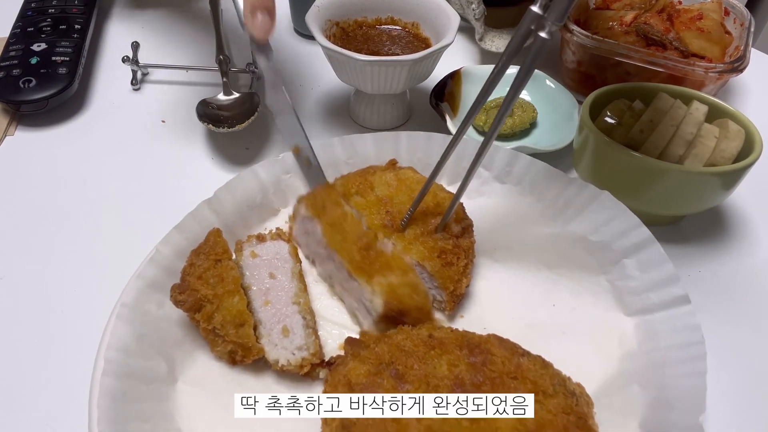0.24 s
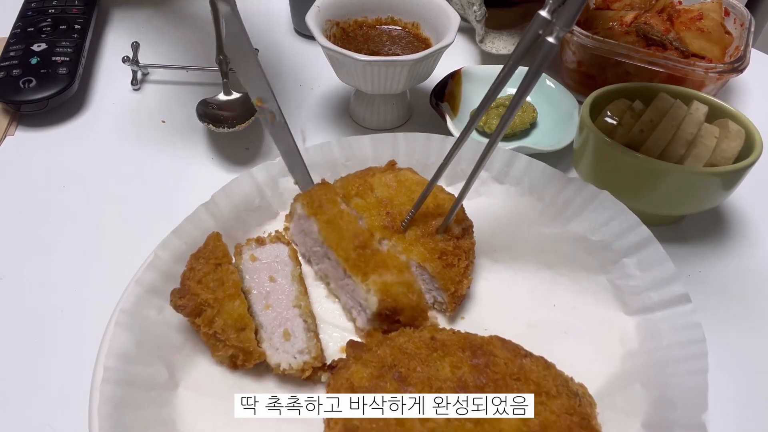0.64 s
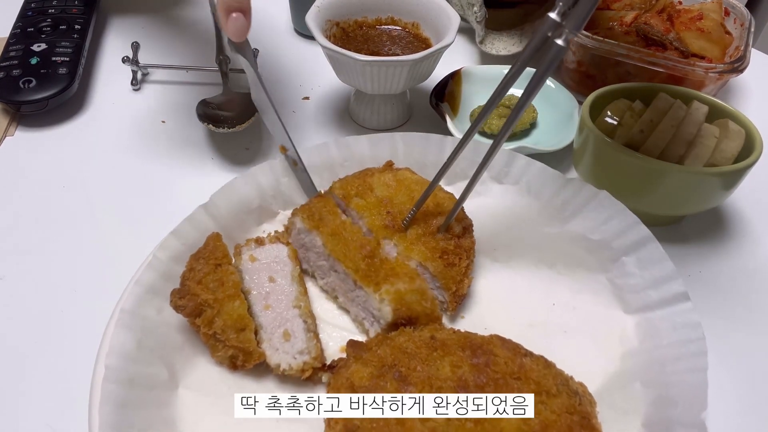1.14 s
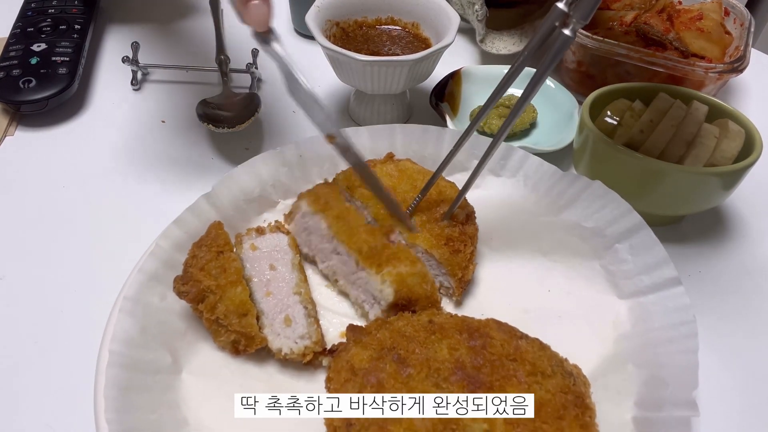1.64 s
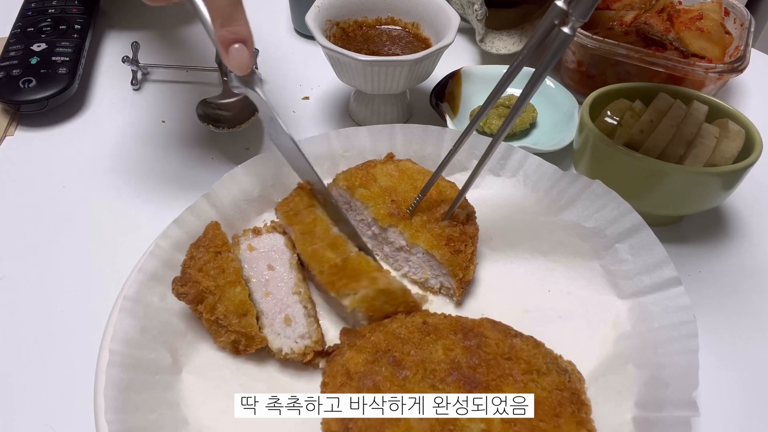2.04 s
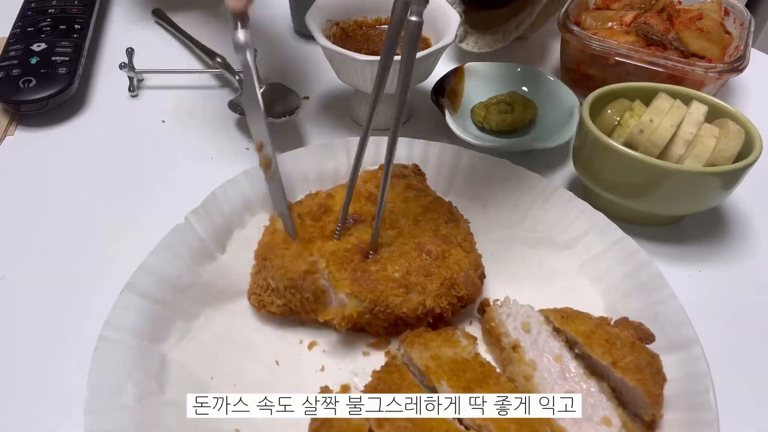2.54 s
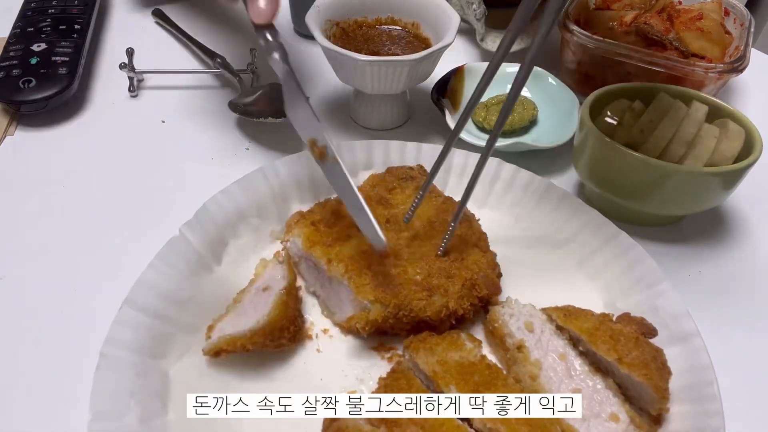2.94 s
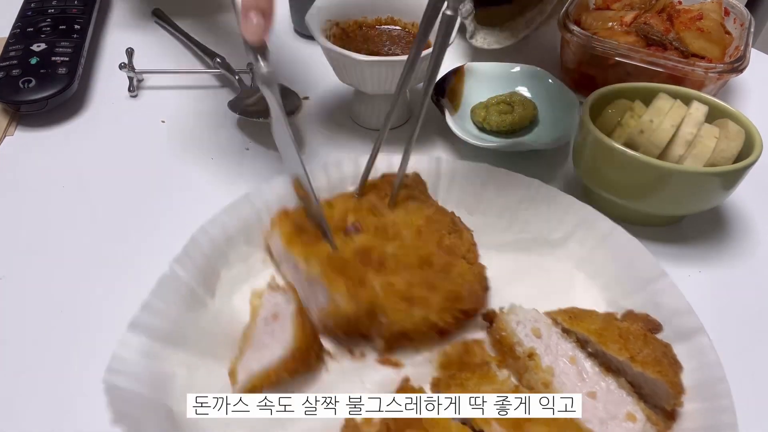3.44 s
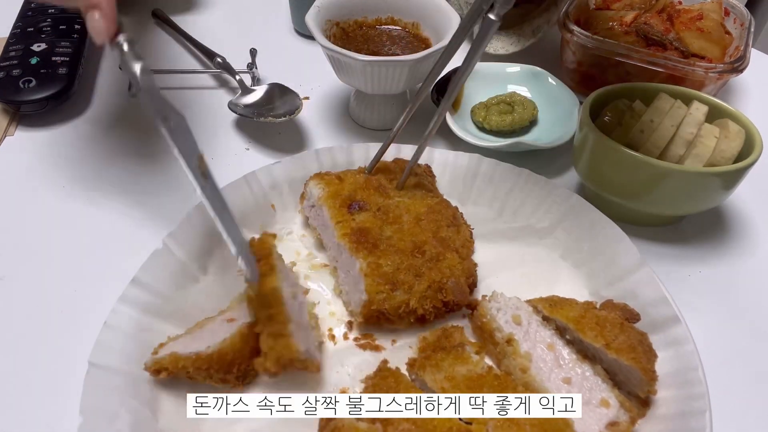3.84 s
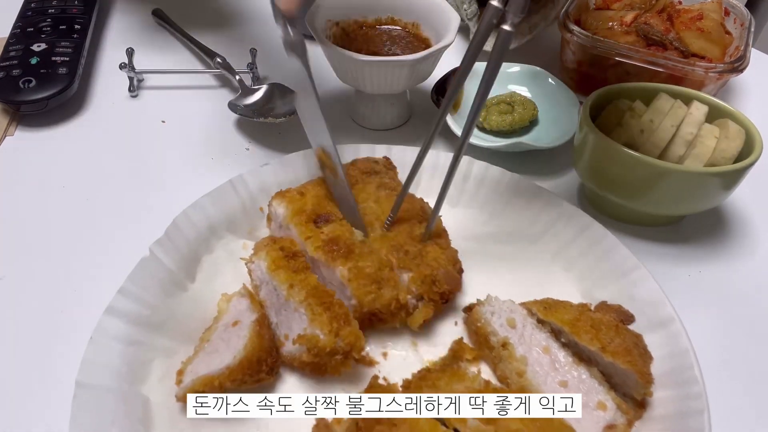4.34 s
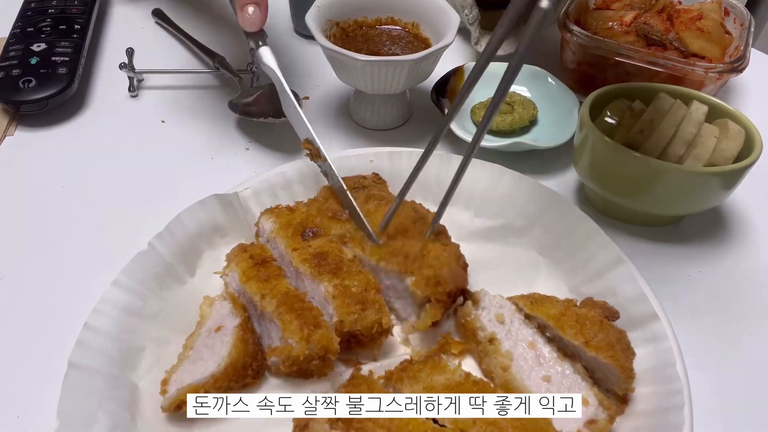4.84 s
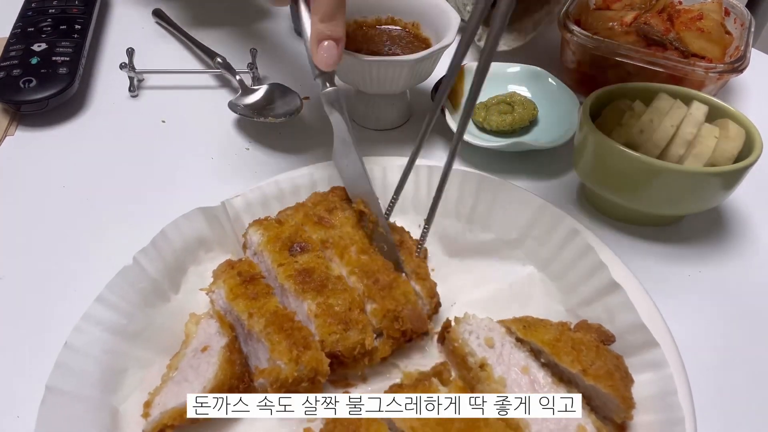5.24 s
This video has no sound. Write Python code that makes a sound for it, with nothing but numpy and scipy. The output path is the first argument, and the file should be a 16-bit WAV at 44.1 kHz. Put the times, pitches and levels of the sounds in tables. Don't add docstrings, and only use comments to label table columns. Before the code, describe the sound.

In a quiet, dry kitchen, a serrated knife saws a crisp breaded cutlet close to a stereo phone microphone. From 0 to 0.2 seconds there are dense crunches, a hollow low plate thud and a table shudder. Crackling scrapes return near 0.25 and 0.36-0.46, then the loudest brittle snaps and crumbling crust at 0.58-0.8. Softer strokes follow around 0.9-1.4, fading to faint rubbing by 1.5-2.2, with one sharp click at 2.2. At 2.3 the sound switches abruptly to sped-up cutting: higher, thin, without bass. Rapid rows of crunchy ticks, roughly 25 per second, run at 2.35-2.7, 3.1-3.7 and 4.1-4.7, the middle one weakening. A short, sparser group follows at 5.0-5.2, then weak dragging ticks at 5.35-5.5. Between them come tiny bright flicks, brief squeaky tones, faint room air and a very quiet wavering motor hum.

```python
import sys
import numpy as np
from scipy import signal
from scipy.fft import rfft, irfft, next_fast_len
from scipy.io import wavfile
from scipy.ndimage import uniform_filter1d, minimum_filter1d

SR = 44100
rng = np.random.default_rng(int(sys.argv[2]) if len(sys.argv) > 2 else 0)


def pcm_store(signal):
    levels = np.round(np.clip(np.atleast_2d(signal), -1, 1) * 32767)
    wavfile.write(sys.argv[1], SR, levels.astype(np.int16).T)


def magnitude_from_level(level_db):
    exponent = np.asarray(level_db, float) / 20
    return 10 ** exponent


N = 242977
TIME = np.arange(N) / SR
CUT_S = 2.312
LEAD = 512


# start in seconds, hold in seconds, crumble level in dB, scrape in dB, plate in dB.
STROKES = [(0.008, 0.0065, -51, -5.5, -6), (0.062, 0.038, -42.5, -5, -10), (0.104, 0.041, -52, 7, 17),
           (0.173, 0.039, -52.5, -1, 11), (0.243, 0.044, -40.5, -4, -6.5), (0.387, 0.054, -37, -2.5, -11.5),
           (0.458, 0.031, -54, 4, 11), (0.579, 0.027, -37, -7, -7.5), (0.671, .12, -41, -3, -1),
           (0.864, 0.04, -40.5, -4.5, -4), (0.998, 0.04, -48.5, -1.5, 7.5), (1.084, 0.29, -58.5, -7, 2.5),
           (1.43, 0.23, -70, -8, -3), (1.829, 0.035, -64.5, -9.5, -13.5), (1.913, 0.033, -58, -8.5, -8.5),
           (2.001, 0.095, -53, -9, -14.5), (2.116, 0.18, -50.5, -9.5, -15)]
# time in seconds, peak in dB, scrape in dB, left minus right in dB.
SNAPS = [(0.023, -23, -4.5, 5), (.034, -17, -1, -9), (.041, -17.5, -1.5, 8), (0.363, -30.5, -2, -2),
         (0.3775, -31, 5, -1), (.385, -41, 2, -6), (0.4182, -37, 7, -5), (0.4412, -21, -2, 5),
         (0.402, -24, -5, 2), (0.4255, -18, -1, 0), (0.6534, -26, -15, 0), (0.6905, -5, -6.5, -8),
         (0.7139, -8.5, -15, -2), (0.7755, -25.5, -23, -15), (0.7902, -12.5, -31, -7),
         (.787, -21, -19.5, 4.5), (0.801, -24, -12.5, -4), (0.8039, -10.5, -13, -6), (1.1138, -27, 0, -5.5),
         (1.1469, -28, -15, 4), (1.1698, -34.5, -9, -9), (1.257, -32, -12.5, -6), (1.586, -35, -12, -4),
         (2.2135, -15, -36, 0), (1.28, -53, -18.5, -2), (1.432, -42, -4.5, -8), (1.521, -49.5, -21, -3.5),
         (1.542, -46.5, -10.5, -6.5), (1.837, -53, -19, -2.5), (1.849, -53.5, -11.5, -1),
         (1.872, -54, -15.5, -4.5), (1.921, -44, -9, -1), (.188, -36, -18, 0), (1.063, -33.5, -20, -2)]
# time in seconds, peak in dB, scrape in dB, left minus right in dB.
CRUSHES = [(0.05, -24.5, -2, -3), (0.0539, -32.5, 9, -1), (0.1277, -20, -14, -0.5), (0.2729, -28, -4, -9),
           (0.4306, -23.5, 3, -8), (0.579, -26, -7, -1), (0.604, -30.5, -13, -1.5), (0.6829, -20, -5, 0),
           (0.762, -25.5, -25, -5), (0.783, -23, -27, 9), (0.901, -28, -12, 4), (1.3459, -39, -25.5, -4),
           (1.3667, -53, -9.5, -2.5), (2.2735, -35, -23, 4.5), (2.2974, -36, -6.5, -5)]
# time in seconds, peak in dB, scrape in dB, plate in dB.
KNOCKS = [(0.113, -15, -1, 2), (0.122, -21.5, 5.5, -2.5), (0.1509, -26, -17, -3.5), (0.1998, -34, -22, -20),
          (0.437, -18.5, 3.5, -11), (0.448, -18, -3.5, -9), (0.7256, -20, -2.5, -12.5),
          (0.737, -33, -13, -7), (0.7447, -20, -17, -15), (0.885, -21.5, -10, -13.5),
          (1.006, -33.5, -16, -1.5), (1.0108, -36.5, -2, 6.5), (1.044, -44.5, -5, 15),
          (1.062, -34, -17, -4.5)]
# frequency in Hz, level in dB per Hz.
CRUST = [(88, -47.5), (150, -16), (330, -3), (575, -10.5), (880, -16.5), (1960, -10), (3020, -16),
         (3740, -12.5), (11800, -15.5), (15500, -12), (16500, -41)]
# frequency in Hz, width in Hz, level in dB.
PLATE = [(140.5, 10, 16.5), (259, 14, -5), (350, 58, -5.5), (579, 40, 8.5), (1210, 78, -5),
         (1826, 54, -17.5), (3767, 4.8, 3)]


def slow_cutting():
    layers = strokes(STROKES, rise_db_s=526, fall_db_s=336)
    bed = [level * magnitude_from_level(db) * sides(np.full(N, -2.5)) for level, db in zip(layers, (1.5, 1.5, -1.5))]
    thin_share = .6
    rows = [(s, db, scrape, -19.5 + thin_share * scrape, -16.5 + thin_share * scrape, pan)
            for s, db, scrape, pan in SNAPS]
    rows += [(s, db, scrape, -21.5, -5.5, pan) for s, db, scrape, pan in CRUSHES]
    rows += [(s, db, scrape, plate, -21, -4) for s, db, scrape, plate in KNOCKS]
    s, peak, scrape, plate, crumb, pan = np.transpose(rows)
    grain = crumbs((3, N), 4600, 1.7)
    force = fractures(crumb, burst_s=0.0005, rise_s=0.0025, fall_s=0.0041, kick=1.6)
    force = add_flakes(force, flake_hz=1000 * 6 ** rng.random(len(s)), flake_db=np.full(len(s), -30.0))

    def body(x, direct_db):
        return ring(colour(x, CRUST), PLATE, direct_db)

    return cut(bed, body(grain[0] + 1.1 * grain[1:], 10.), body(force, 0.), s - .0006,
               peak_db=peak + np.array([0 * s + 4.1, scrape + 1.4, plate + 0.29]),
               pan_db=pan + np.array([[1.5], [-1.2], [-2.5]]),
               edges_hz=[(3300, 16800), (850, 3300), (150, 850)], flicker_db=0.72, flicker_rate=30)


# start in seconds, hold in seconds, crumble level in dB, top in dB, plate in dB.
PASSES = [(2.342, 0.22, -51.5, -0.5, -2), (2.59, 0.15, -52.5, 12, 0), (2.715, 0.15, -60, 12.5, 5),
          (2.9, 0.16, -65.5, -3.5, 3.5), (3.08, 0.31, -52, 1.5, 1.5), (3.454, 0.26, -49, 4.5, 0),
          (3.694, 0.19, -64, 11, -11.5), (3.93, 0.18, -69, -1, 7.5), (4.106, 0.45, -55, -3, 0.5),
          (4.36, 0.26, -52, 4, 1), (4.76, 0.13, -62.5, 7.5, -4.5), (5.016, 0.12, -53.5, 4, -2.5),
          (5.19, 0.13, -56.5, -9, 1.5), (5.37, 0.069, -45, -0.5, -12), (5.416, .1, -47, 0, 2)]
# time in seconds, peak in dB, plate in dB.
EARLY_SLICES = [
    [(2.3463, -29.5, -12), (2.3906, -19, -6), (2.4326, -16, -10), (2.4729, -19, -25), (2.513, -30, -13),
     (2.5483, -12, -10.5), (2.5873, -31, -4), (2.6023, -40, -14), (2.6242, -20.5, -12.5),
     (2.6385, -29, -18), (2.6579, -22, -8.5), (2.686, -20.5, -10.5)],
    [(3.091, -36.5, -1.5), (3.1245, -17.5, -9), (3.1603, -14.5, -18.5), (3.196, -11, -16.5),
     (3.2314, -16.5, -11), (3.2684, -28.5, -7.5), (3.3187, -32.5, 1), (3.3641, -18, -13.5),
     (3.4887, -33, -1), (3.4948, -31, -27), (3.5338, -46, 12.5), (3.565, -30.5, -7), (3.5746, -41, -17),
     (3.5967, -36, -11), (3.6305, -36, 3.5), (3.6399, -30.5, -15), (3.6548, -27, -11), (3.67, -27, -8),
     (3.6812, -29, -4.5), (3.7031, -22.5, -18)],
]
# time in seconds, peak in dB, plate in dB.
LATE_SLICES = [
    [(4.1069, -43, 4.5), (4.1469, -24, -22.5), (4.1806, -23.5, -8), (4.2335, -39, -10), (4.2496, -20, -10),
     (4.2876, -15.5, -12.5), (4.3237, -21, -7.5), (4.3578, -31.5, -1.5), (4.3946, -13, -15.5),
     (4.4357, -23, -8), (4.4721, -28, -6.5), (4.5095, -24.5, -5), (4.5475, -27, -15), (4.5838, -13.5, -15),
     (4.6164, -10, -18.5), (4.6305, -43.5, -2), (4.6469, -22, -7.5), (4.674, -40, -3.5)],
    [(5.0238, -37.5, -3.5), (5.0622, -18.5, -9.5), (5.1103, -33.5, -9), (5.1417, -23, -9.5),
     (5.1767, -37.5, -1.5), (5.3292, -41.5, 6.5), (5.3798, -34.5, -3), (5.4156, -40, 5),
     (5.4448, -28.5, 1.5), (5.4784, -34.5, -3.5)],
]
# time in seconds, peak in dB, top in dB.
FLICKS = [(2.7408, -31.5, 7), (2.772, -45.5, 16), (2.801, -53, 22.5), (2.8382, -37.5, 10),
          (2.8667, -47, 16.5), (3.2842, -36, 15), (3.7831, -47.5, 14.5), (4.164, -39.5, 13),
          (5.153, -37.5, 1), (2.7133, -43.5, 20), (2.7633, -44, 19), (2.824, -53.5, 22), (2.917, -53, 11),
          (3.063, -61, 19.5), (3.764, -58, 21.5), (4.751, -53, 7.5), (4.9315, -59, 10), (5.2473, -46.5, -7)]
# time in seconds, peak in dB, plate in dB, ringing in Hz.
DRAGS = [
    (2.34, -46, 9.5, 1170),
    (2.504, -40, 10, 1210),
    (2.543, -41, 10, 1130),
    (2.692, -30, -10, 3100),
    (3.462, -37, 3.5, 1153),
    (4.212, -48, 7.5, 1083),
    (5.367, -40, 6.5, 1293),
    (5.407, -34.5, 5, 1150),
    (5.439, -45, 5, 2420),
    (5.459, -47, 11, 1120),
]
FLAKES_HZ = np.array([1130, 2130, 4640])
# time in seconds, frequency in Hz.
HIGH_FLAKES = [(2.6579, 1470), (3.1603, 1490), (3.2684, 1370), (3.5967, 1380), (4.3946, 1250),
               (4.4721, 1230), (4.5095, 1460), (4.5475, 1470)]
# frequency in Hz, level in dB per Hz.
FAST_CRUST = [(180, -56), (300, -33), (500, -19), (810, -21), (1110, -8), (1800, -9.5), (2200, -1.5),
              (3100, -3.5), (5100, -12.5), (5500, -10), (7000, -13), (11000, -16), (13500, -8),
              (15800, -6.5)]
# frequency in Hz, width in Hz, level in dB.
FAST_PLATE = [(1115, 45, -2), (2073, 63, -5), (3100, 320, 2), (4830, 495, 11)]


def fast_cutting():
    layers = strokes(PASSES, rise_db_s=384, fall_db_s=298)
    bed = [level * magnitude_from_level(db) * sides(np.full(N, -3.)) for level, db in zip(layers, (-2.5, -6.5, -5.5))]
    rows = [(s, db, -2 - 0.27 * (db + 27.0), plate, -6 - 0.81 * (db + 24.5) + 0.31 * plate)
            for s, db, plate in sum(EARLY_SLICES + LATE_SLICES, [])]
    rows += [(s, db, top, -4, -10) for s, db, top in FLICKS]
    rows += [(s, db, 5.5, plate, 35) for s, db, plate, hz in DRAGS]
    s, peak, top, plate, crumb = np.transpose(rows)

    flake_hz = rng.choice(FLAKES_HZ, len(s)) * (1 + 0.0074 * rng.standard_normal(len(s)))
    flake_hz[-len(DRAGS):] = np.transpose(DRAGS)[-1]
    high_s, high_hz = np.transpose(HIGH_FLAKES)
    high = np.abs(s[:, None] - high_s).argmin(axis=0)
    flake_hz[high] = high_hz
    flake_db = np.full(len(s), -32.0)
    flake_db[high] = -30.0

    grain = crumbs((3, N), 6000, 2.)
    burst_s = 0.000132 * magnitude_from_level(-0.56 * (peak + 14.5))
    kick = 6.4 * magnitude_from_level(0.7 * (peak + 15.5))
    force = fractures(crumb, burst_s, rise_s=0.0029, fall_s=0.00423, kick=kick)
    force = add_flakes(force, flake_hz, flake_db)

    def body(x, direct_db):
        return ring(colour(x, FAST_CRUST), FAST_PLATE, direct_db)

    return cut(bed, body(grain[0] + .5 * grain[1:], 10.), body(force, 0.), s - .0007,
               peak_db=peak + np.array([0 * s + 0.46, top + 2.6, plate + 0.22]),
               pan_db=0 * s + np.array([[-3.2], [-.8], [-5]]),
               edges_hz=[(1600, 5300), (7000, 17000), (350, 1600)], flicker_db=4.0, flicker_rate=90)


def strokes(table, rise_db_s, fall_db_s):
    start, hold, level, second, third = np.transpose(table)[:, :, None]
    rise_db = rise_db_s * np.maximum(start - TIME, 0)
    fall_db = fall_db_s * np.maximum(TIME - start - hold, 0)
    power = magnitude_from_level(2 * (level - rise_db - fall_db))
    return [np.sqrt(np.sum(power * magnitude_from_level(2 * layer), axis=0)) for layer in (0, second, third)]


def crumbs(shape, rate, spread_db):
    hits = rng.random(shape) < rate / SR
    return hits * rng.standard_normal(shape) * magnitude_from_level(spread_db * rng.exponential(size=shape))


def fractures(crumb_db, burst_s, rise_s, fall_s, kick):
    lag = (np.arange(4096) - LEAD) / SR
    snap = rng.standard_normal((len(crumb_db), 4096)) * np.exp(-np.abs(lag) / np.reshape(burst_s, (-1, 1)))
    snap = snap * np.where(lag >= 0, 1, .4)
    snap[:, LEAD] += kick
    swell = crumbs(snap.shape, 7000, 2.77) * np.exp(-np.where(lag < 0, -lag / rise_s, lag / fall_s))
    return snap + magnitude_from_level(crumb_db)[:, None] * swell


def add_flakes(force, flake_hz, flake_db):
    ago = np.arange(512) / SR
    flake = np.sin(2 * np.pi * flake_hz[:, None] * ago) * np.exp(-ago / 0.0016)
    return force + magnitude_from_level(flake_db)[:, None] * signal.fftconvolve(force, flake, axes=1)[:, :4096]


def cut(bed, grain, sound, start_s, peak_db, pan_db, edges_hz, flicker_db, flicker_rate):
    out = np.zeros((2, N + 4096))
    at = np.maximum((start_s * SR).astype(int)[:, None] + np.arange(4096) - LEAD, 0)
    chatter_db = 3.14 * walk(110)
    for level, db, pan, (lo_hz, hi_hz) in zip(bed, peak_db, pan_db, edges_hz):
        part = band(grain, lo_hz, hi_hz) * magnitude_from_level(flicker_db * walk(flicker_rate) + chatter_db)
        out[:, :N] += part / np.std(part) * level
        part = band(sound, lo_hz, hi_hz)
        part = part * (magnitude_from_level(db) / np.abs(part).max(axis=1))[:, None]
        for side, gain in zip(out, sides(pan)):
            np.add.at(side, at, part * gain[:, None])
    return out[:, :N]


# start in seconds, hold in seconds, level in dB, frequency in Hz, width in Hz.
SINGING = [(.034, .024, -36, 1200, 130), (.048, .002, -31, 5500, 1500), (.069, .028, -43, 1250, 220),
           (.0701, .04, -49, 3750, 90), (.098, .012, -41, 1850, 230), (.111, .003, -29, 6500, 1500),
           (.119, .002, -29, 7000, 2000), (.125, .045, -47, 2000, 140), (.23, .06, -47, 1400, 240),
           (.376, .095, -46, 3750, 120), (.424, .022, -35, 1300, 270), (.428, .02, -38, 2600, 300),
           (.56, .048, -48.5, 1300, 230), (.568, .042, -43, 6000, 2000), (.58, .025, -41, 1700, 500),
           (.632, .018, -45, 400, 200), (.672, .044, -40, 3750, 120), (.673, .016, -34, 1700, 400),
           (.689, .002, -25, 6500, 2000), (.705, .03, -37, 290, 55), (.7125, .002, -26, 6200, 2000),
           (.744, .02, -37, 3750, 100), (.755, .015, -37, 5500, 1500), (.789, .003, -31, 7000, 1500),
           (.865, .04, -44, 4700, 800), (.96, .045, -49, 6200, 500), (.997, .025, -46, 3750, 99),
           (1, .05, -49, 2100, 250), (1.02, .04, -52, 5500, 200), (1.582, .009, -54, 2200, 300),
           (1.92, .075, -74, 1775, 410), (2.04, .24, -61.5, 1850, 350), (1.062, .002, -52, 14500, 3000),
           (2.2135, .001, -44, 14500, 3000),
           (2.465, .009, -37, 1470, 60), (2.466, .014, -38, 1120, 36), (2.503, .01, -47, 1300, 200),
                (2.58, .008, -39, 12700, 4200), (2.652, .013, -47, 11000, 3300),
                (2.9, .0066, -54, 10000, 4400), (3.305, .01, -49, 1140, 83), (3.333, .008, -48, 6700, 500),
                (3.475, .02, -45, 2600, 500), (3.975, .006, -62, 13000, 4000),
                (4.09, .02, -60, 13000, 4000), (4.208, .01, -46.5, 1350, 130),
                (4.226, .012, -51, 12000, 4000), (4.43, .012, -45, 1560, 254),
                (4.525, .005, -56, 13000, 4000), (4.542, .013, -45.5, 1840, 270),
                (5.36, .019, -51, 1250, 91), (5.436, .013, -38, 2340, 440)]


def singing():
    out = np.zeros((2, N))
    for start, hold, db, hz, width in SINGING:
        span = slice(max(int((start - .03) * SR), 0), int((start + hold + .05) * SR))
        t = TIME[span]
        grain = crumbs((3, len(t)), 6000, 2.)
        tone = ring(grain[0] + .4 * grain[1:], [(hz, width, 0.)], -60.)
        tone = tone / np.sqrt(uniform_filter1d(np.mean(tone ** 2, axis=0), size=600))
        rise_db = 2998.5 * np.maximum(start - t, 0)
        fall_db = 1505 * np.maximum(t - start - hold, 0)
        out[:, span] += tone * magnitude_from_level(db - rise_db - fall_db) * sides(np.full(len(t), -3.5))
    return out


# start in seconds, hold in seconds, level in dB rms, frequency in Hz, 60 dB decay time in seconds.
RINGS = [(.0335, .001, -29, 1700, .015), (.0405, .002, -25, 1200, .025), (.048, .002, -27, 1230, .025),
         (.0555, .002, -29, 1190, .025), (.1125, .003, -22, 1950, .025), (.1125, .004, -29, 3750, .04),
         (.1135, .004, -17, 570, .035), (.261, .006, -38, 310, .04), (.362, .001, -38, 1600, .02),
         (.362, .002, -43, 3750, .03), (.3765, .001, -31, 1700, .02), (.447, .003, -36, 3800, .05),
         (.567, .007, -41, 450, .04), (.692, .006, -28, 560, .04), (.693, .008, -29, 320, .05),
         (.7445, .007, -26, 590, .02), (.802, .002, -33, 1790, .02), (1.038, .012, -39, 480, .03),
         (3.315, .006, -41, 1140, .06), (3.458, .008, -47, 1130, .04), (3.494, .003, -43, 4800, .03)]


def rings():
    out = np.zeros(N)
    ago = np.arange(4096) / SR
    for start, hold, db, hz, t60_s in RINGS:
        at = int(start * SR)
        rise = np.minimum(ago / 0.00096, 1)
        shape = rise * magnitude_from_level(db - 60 * np.maximum(ago - hold, 0) / t60_s)
        out[at:at + len(ago)] += np.sqrt(2) * shape * np.sin(2 * np.pi * hz * ago)
    left, right = out * sides(np.full(N, -7.))
    return np.array([left_port(left, PORTS), right])


# time in seconds, level in dB.
RUMBLE = [
    (0.0, -46),
    (0.08, -40),
    (1.52, -60.5),
    (2.31, -61.5),
]


def rumble():
    noise = rng.standard_normal((3, N))
    both = noise[0] + .42 * noise[1:]
    low = ring(band(both, 42, 210), PLATE[:1], -0.5)
    return low / np.std(low) * magnitude_from_level(curves(RUMBLE)[0] - 6.5)


# frequency in Hz, level in dB rms.
HUM = [(298, -85), (635.2, -68.5), (1174, -72), (1233, -79), (1712, -68.5), (1760, -73.5), (2347, -92),
       (2638, -73)]


def hum():
    out = np.zeros(N)
    for hz, db in HUM:
        level = magnitude_from_level(db - 3.5 + 3.4 * walk(8.8))
        out += level * np.sin(2 * np.pi * hz * TIME + 1.35 * walk(8.1))
    return np.sqrt(2) * out


# frequency in Hz, level in dB per Hz.
KITCHEN = [(15, -49), (25, -18), (81, -4.5), (167, -8.5), (219, -6.5), (488, -15.5), (588, -27.5),
           (691, -21.5), (1210, -43), (15000, -49.5)]
# frequency in Hz, level in dB per Hz.
FAST_KITCHEN = [(35, -100.5), (60, -46), (329, -15.5), (406, 0.5), (478, -8.5), (537, -3), (694, -13),
                (780, -2.5), (1720, -7.5), (5800, -16), (15800, -41)]


def kitchen(points, db, alike_hz):
    mid, side = rng.standard_normal((2, 1, N))
    side = signal.lfilter(*signal.butter(1, alike_hz, "high", fs=SR), side)
    air = colour(mid + side * np.array([[1], [-1]]), points) * magnitude_from_level(0.34 * walk(44))
    return air / np.std(air) * magnitude_from_level(db)


# delay in seconds, level in dB.
FAST_ECHOES = [
    (.0035, -21),
    (0.014, -28.5),
]


def room(x, echoes, t60_s, tail_db, lo_hz):
    lag = np.arange(int(.3 * SR)) / SR
    shape = magnitude_from_level(tail_db - 60 * lag / t60_s) * (lag > .001)
    for delay_s, db in echoes:
        shape = shape + magnitude_from_level(db - 23.0) * np.exp(-((lag - delay_s) / 0.0011) ** 2)
    tail = signal.fftconvolve(x, shape * rng.standard_normal((2, len(lag))), axes=1)[:, :N]
    return x + band(tail, lo_hz, 22000)


# frequency in Hz, lead of the left in radians.
PORTS = [(300, 0), (780, -.7), (1460, .1), (3450, -1.6), (6200, -1.5), (9000, -.1), (11400, 0),
         (13000, 3.1)]
# frequency in Hz, lead of the left in radians.
FAST_PORTS = [(520, -.5), (860, 0), (3270, 0), (3530, -.5), (4740, .1), (6030, .6), (6800, -3.2),
              (7920, -6.4), (9990, -5.5), (11800, -6.3)]


def left_port(x, ports):
    size = next_fast_len(N + 4096)
    lead = np.interp(np.linspace(0, SR / 2, size // 2 + 1), *np.transpose(ports))
    return irfft(rfft(x, size) * np.exp(1j * lead), size)[:N]


def gated_centre_top(x, edge_hz, strip_hz, gate_db, hush_db):
    mid = x.mean(axis=0)

    def high(hz):
        return signal.sosfiltfilt(signal.ellip(8, .1, 70, hz, "high", fs=SR, output="sos"), mid)

    top, strip = high(edge_hz), high(strip_hz)
    short = np.resize(top ** 2, (N // 1024 + 1, 8, 128)).mean(axis=2)
    usual = np.median(short, axis=1)[:, None]
    db = 10 * np.log10(usual)
    weak = (db < gate_db) & (db > hush_db) & (short < 4 * usual)
    drop = uniform_filter1d(1. * np.repeat(weak, 128)[:N], size=128)
    strip_stays = uniform_filter1d(1. * (walk(20) > .8), size=512)
    return x - drop * (top - strip * strip_stays)


def ragged_top(x, edges_hz, margin_db):
    for lo_hz, hi_hz in zip(edges_hz, edges_hz[1:]):
        sos = signal.butter(4, [lo_hz, hi_hz], "band", fs=SR, output="sos")
        top = signal.sosfiltfilt(sos, x)
        db = 10 * np.log10(uniform_filter1d(np.mean(top ** 2, axis=0), size=128) + 1e-14)
        ahead_db = -minimum_filter1d(-db, size=701, origin=-350)
        dropped = db + 3 * walk(150) < ahead_db - margin_db
        x = x - top * uniform_filter1d(1. * dropped, size=64)
    return x


def curves(table):
    s, *columns = np.transpose(table)
    return [np.interp(TIME, s, c) for c in columns]


def colour(x, points):
    hz, db = np.transpose(points)
    log_gain = np.interp(np.log(np.linspace(1, SR / 2, 1025)), np.log(hz), db) * np.log(10) / 20
    cep = irfft(log_gain)
    cep[1:1024] *= 2
    cep[1025:] = 0
    response = irfft(np.exp(rfft(cep)))
    return signal.fftconvolve(x, response[None], axes=1)[:, :x.shape[1]]


def ring(x, peaks, direct_db):
    out = magnitude_from_level(direct_db) * x
    for hz, width, db in peaks:
        out = out + magnitude_from_level(db) * signal.lfilter(*signal.iirpeak(hz, hz / width, fs=SR), x)
    return out


def band(x, lo_hz, hi_hz):
    return signal.sosfilt(signal.butter(3, [lo_hz, hi_hz], "band", fs=SR, output="sos"), x)


def sides(pan_db):
    return magnitude_from_level(np.array([pan_db, -pan_db]) / 2)


def walk(rate):
    k = int(SR / rate)
    held = np.repeat(rng.standard_normal(N // k + 1), k)
    return 1.16 * uniform_filter1d(uniform_filter1d(held, k), k)[:N]


# frequency in Hz, level in dB.
TREBLE_DIP = [(5150, 0), (5450, -6), (6200, -5), (6800, 1)]


def scene():
    slow = room(slow_cutting(), [], t60_s=0.15, tail_db=-35.5, lo_hz=740)
    slow[0] = left_port(slow[0], PORTS)
    slow = slow + kitchen(KITCHEN, -60.5, alike_hz=370) + rumble()
    slow = gated_centre_top(slow, edge_hz=13100, strip_hz=15300, gate_db=-50, hush_db=-73)

    dipped = colour(fast_cutting(), TREBLE_DIP)
    fast = room(dipped, FAST_ECHOES, t60_s=0.042, tail_db=-27.5, lo_hz=590)
    fast = fast + kitchen(FAST_KITCHEN, -61, alike_hz=750) + hum()
    fast[0] = left_port(fast[0], FAST_PORTS)
    fast = ragged_top(fast, [4200, 5600, 7500, 9500, 12000, 15500], margin_db=28)

    sung = singing() + rings() + rings()
    share = np.clip((TIME - CUT_S) / .004, 0, 1)
    return (slow + sung) * (1 - share) + (fast + sung) * share


def top_cut(x):
    return signal.sosfilt(signal.butter(12, 17140, fs=SR, output="sos"), x)


def record(dry):
    soft = .7 * np.tanh(dry / .7)
    mix = signal.sosfilt(signal.ellip(8, .2, 42, 15900, fs=SR, output="sos"), soft)
    return top_cut(mix)


dry = scene()
out = record(dry)
pcm_store(out)
```